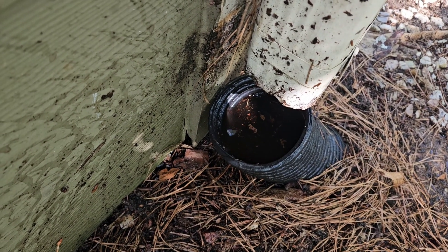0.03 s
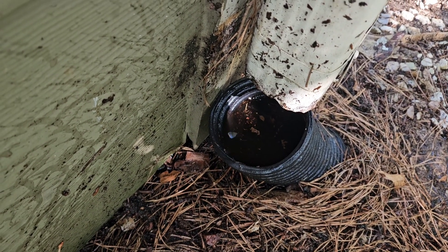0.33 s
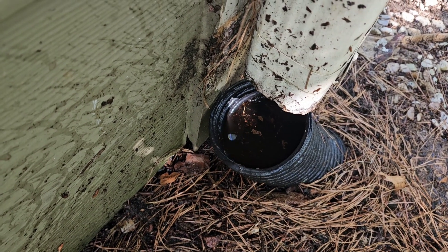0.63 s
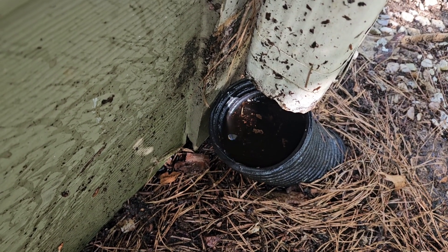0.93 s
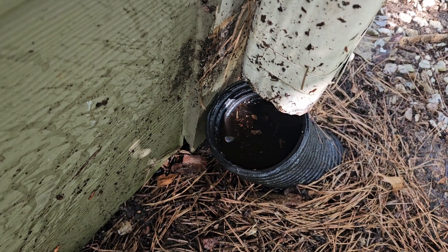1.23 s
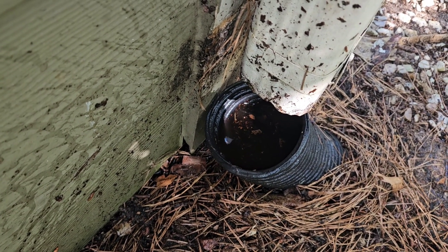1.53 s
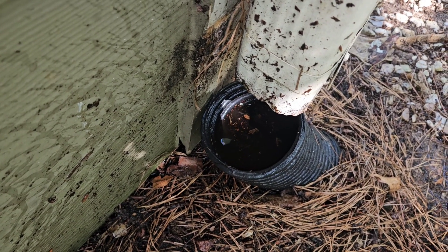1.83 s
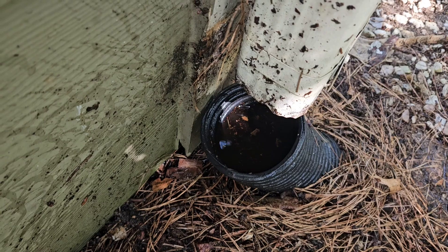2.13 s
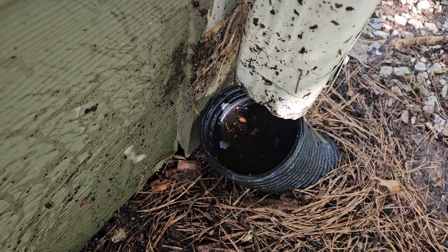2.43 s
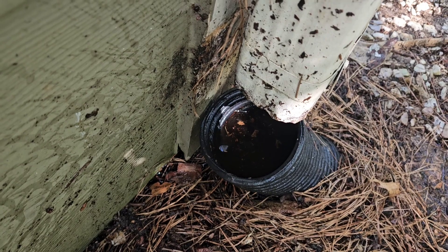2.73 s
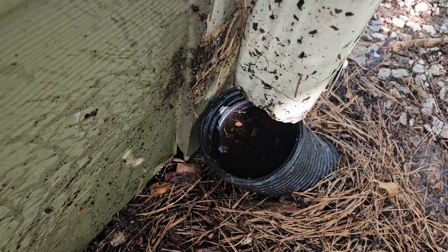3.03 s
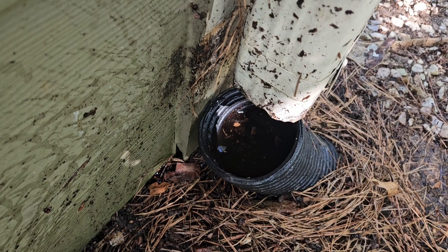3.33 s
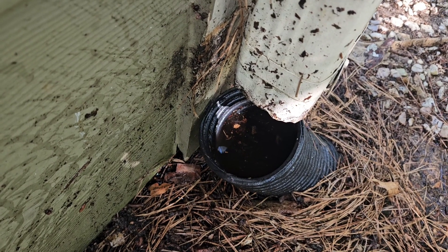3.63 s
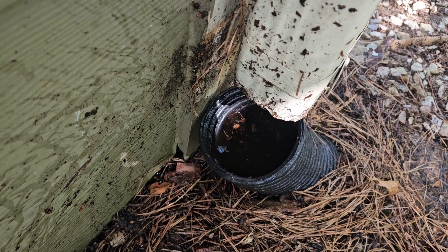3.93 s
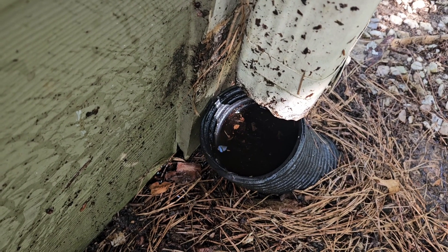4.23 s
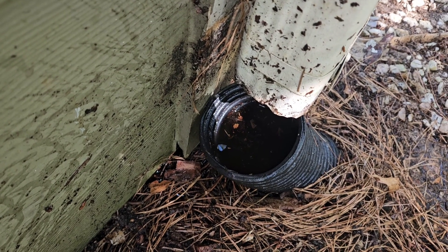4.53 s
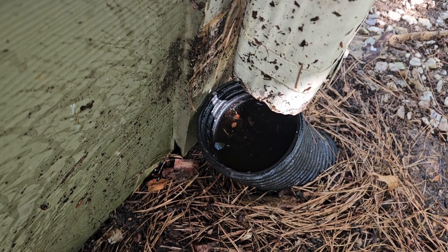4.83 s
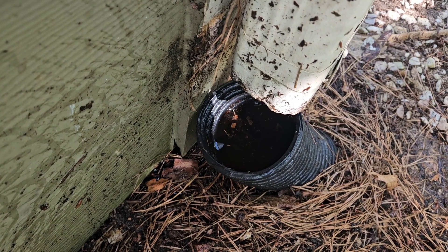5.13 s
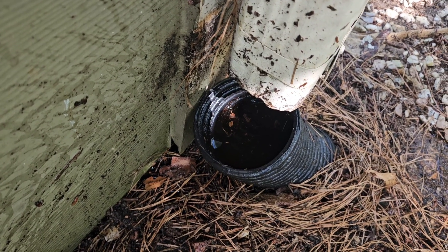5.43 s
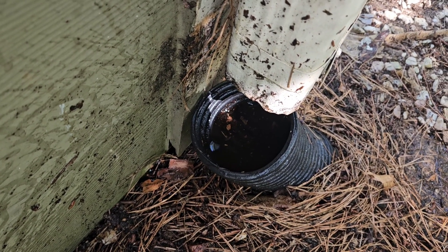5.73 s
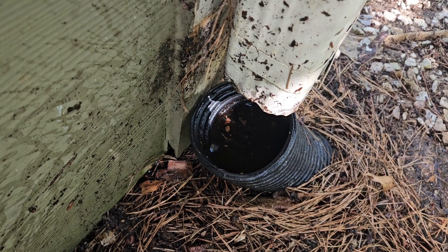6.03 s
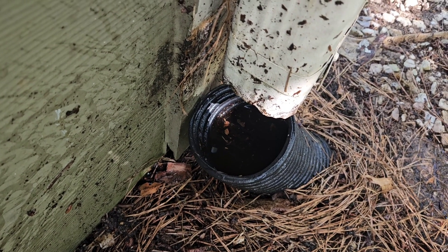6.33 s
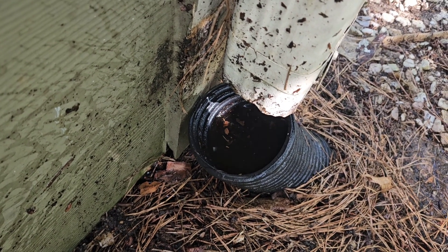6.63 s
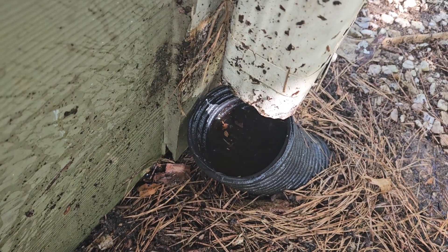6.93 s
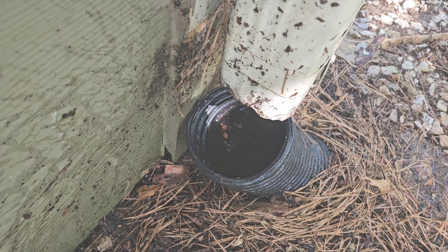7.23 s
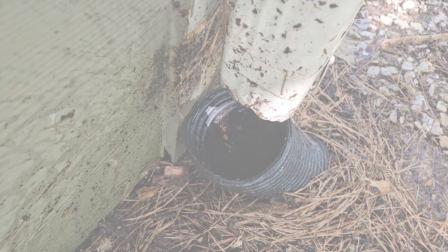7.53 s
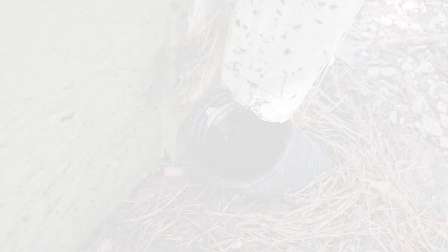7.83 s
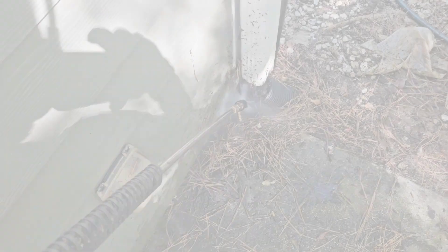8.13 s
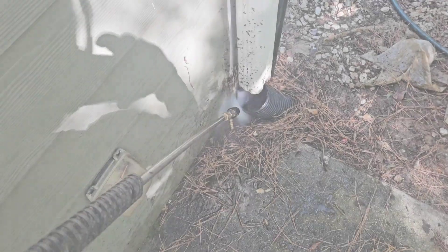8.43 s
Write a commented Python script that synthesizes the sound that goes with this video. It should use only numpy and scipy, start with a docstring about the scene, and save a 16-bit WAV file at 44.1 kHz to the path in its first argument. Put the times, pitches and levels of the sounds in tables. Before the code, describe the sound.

A pressure washer engine thumps steadily outdoors with a low drone and metallic clatter, then fades out near the end.

```python
"""A pressure washer's one-cylinder engine thumps steadily beside a house wall.
Each firing sends a puff through the muffler, the metal casing rings and clatters, and the valve gear
rasps twice per cycle (one cycle is one firing, or two turns of the shaft). The sound fades out,
then starts to fade in from another spot, where the water jet hisses against a drain pipe."""
import sys
import numpy as np
from scipy import signal
from scipy.fft import rfft, irfft, next_fast_len
from scipy.io import wavfile

SR = 44100
rng = np.random.default_rng(int(sys.argv[2]) if len(sys.argv) > 2 else 0)


def dump(signal):
    """Clip the signal to [-1, 1] and save it as 16-bit WAV at the path in sys.argv[1]."""
    limited = np.clip(np.atleast_2d(signal).T, -1, 1)
    pcm = np.round(limited * 32767).astype(np.int16)
    wavfile.write(sys.argv[1], SR, pcm)


N = 374850
TIME = np.arange(N) / SR
FFT_SIZE = 2 * next_fast_len(N // 2 + 8192)
FREQ = np.maximum(np.arange(FFT_SIZE // 2 + 1) * SR / FFT_SIZE, 1)

# How the muffler and wall shape the thump at each spot: firing_rate_multiple, relative_db
THUMP_FIRST_SPOT = [(1, -35.3), (2, -12.9), (3, -10.1), (4, -4.1), (5, 0.0), (6, -12.1), (7, -5.1),
                    (8, -2.1), (9, -11.5), (10, -13.5), (11, -23.9), (12, -27.9), (13, -27.7), (14, -31.4)]
THUMP_SPRAY_SPOT = [(1, -26.8), (2, -11.8), (3, -19.6), (4, 0.0), (5, -2.6), (6, -7.7), (7, -8.2),
                    (8, -13.7), (9, -18.3), (10, -28.0), (11, -26.1), (12, -32.6), (13, -33.0), (14, -26.7)]
# Tones of the casing at each spot: firing_rate_multiple (rounded when played), left_db, right_db
TONES_FIRST_SPOT = [(11, -46, -52), (18, -46, -76), (22, -43.5, -48), (24, -45, -46), (30, -47.5, -44.5),
                    (31, -41.5, -35), (32, -48, -40), (37, -46, -40.5), (38, -48, -43), (39, -57, -42),
                    (55, -53, -51), (56, -44, -37.5), (70.84, -63, -39.5), (87, -71, -44.5)]
TONES_SPRAY_SPOT = [(14, -38, -42), (24, -30, -47), (25, -42, -29), (37, -48, -32), (54, -45, -31)]
# The noise of the moving parts: pitch_hz, left_db, right_db
CLATTER_SHAPE = [(24.7, -75.5, -64.5), (160, -50.5, -54), (347, -60, -65.5), (470, -64, -69),
                 (754, -60.5, -65.5), (815, -69, -59.5), (1300, -76.5, -64.5), (1525, -67, -57.5),
                 (2020, -61.5, -66), (2350, -67.5, -66.5), (3640, -72.5, -67), (4500, -72.5, -67.5),
                 (8200, -71.5, -66.5), (15200, -74, -77.5)]
# Pitches the casing boosts by ringing, or weakens if negative: pitch_hz, width_hz, boost_db
CASING_RINGS = [(844, 47, 6), (1050, 127, 5), (1401, 75, 6), (1580, 100, 3.5), (1950, 53, 4), (2130, 18, 3),
                (2500, 22, 4), (2580, 36, 4.5), (4340, 260, 7), (5880, 89, -4.5), (7400, 110, 3.5),
                (8710, 1020, 5.5), (12200, 320, -0.5)]
# The valve gear's two rasps: start_cycles, rise_cycles, pitch_hz, width_hz, level_db
VALVE_RASPS = [(.297, 0.12, 7950, 7800, -68.5), (.647, 0.091, 13700, 7000, -65.5)]
# Water hiss and engine noise at the spraying spot: pitch_hz, left_db, right_db
SPRAY_SHAPE = [(25, -70, -63), (150, -56, -46), (516, -76, -61.5), (680, -55, -58), (1290, -55.5, -50),
               (1800, -61, -59.5), (2500, -59.5, -57), (3300, -62, -61), (4940, -69, -65),
               (5630, -56.5, -59), (8050, -59.5, -53.5), (10300, -62, -62), (12200, -61, -60),
               (15500, -65, -70)]

FIRING_HZ, SPRAY_FIRING_HZ = 27.956, 27.5
SILENT_AT_S, FADE_S = 7.942, 1.69
JET_HITS_S, JET_RISE_S, JET_MISS_DB = 8.12, .05, -2
LEFT_DELAY_SAMPLES, TOP_HZ = 19, 15850


def undb(db):
    """Turn decibels into a number to multiply by."""
    return 10 ** (np.asarray(db) / 20)


def curve(hz, db):
    """A tone shape (dB at every pitch) drawn through a few points."""
    return np.interp(np.log(FREQ), np.log(hz), db)


def bumps(rows):
    """A tone shape made of rounded peaks and dips."""
    return sum(db / (1 + (2 * (FREQ - hz) / width) ** 2) for hz, width, db in rows)


def colour(x, db):
    """Filter a sound by a tone shape so that it rings after a knock, never before."""
    cepstrum = irfft(db * np.log(10) / 20)
    cepstrum[..., 1:FFT_SIZE // 2] *= 2
    cepstrum[..., FFT_SIZE // 2 + 1:] = 0
    return irfft(rfft(x, FFT_SIZE) * np.exp(rfft(cepstrum)))[..., :N]


def noise():
    """An even hiss, 0 dB per Hz."""
    return rng.standard_normal(N) * np.sqrt(SR / 2)


def wander(rate_hz):
    """A value that drifts at random, typically about 1 away from zero."""
    steps = rng.standard_normal(2048)
    return np.interp(TIME * rate_hz, np.arange(len(steps)), steps) * np.sqrt(3 / 2)


def stereo(x):
    """Sound reaches the right microphone just before the left."""
    return np.array([np.pad(x, (LEFT_DELAY_SAMPLES, 0))[:N], x])


def scatter(direct, loudness, corner_hz):
    """Low sound mostly arrives straight; higher up, scattered noise, unlike on each side, takes over."""
    direct_share = .2 + .72 / (1 + (FREQ / corner_hz) ** 2)
    scattered = loudness * np.array([noise(), noise()])
    straight = colour(stereo(direct), 10 * np.log10(direct_share))
    return straight + colour(scattered, 10 * np.log10(1 - direct_share))


def ripple(db, spacing_hz):
    """Many small rings and echoes make the treble uneven, differently on each side."""
    heights = rng.standard_normal((2, 1024))
    depth_db = db * np.minimum(FREQ / 3500, 1)
    return depth_db * np.array([np.interp(FREQ / spacing_hz, np.arange(1024), row) for row in heights])


def engine_cycles():
    """Count cycles at the speed the governor holds: it creeps up a little and wavers slightly."""
    firing_hz = FIRING_HZ + .012 * TIME
    return .093 + np.cumsum(firing_hz) / SR + .014 * wander(3.5)


def exhaust(cycles, shape, db, uneven_db, jitter_s, side_gap_db):
    """Each firing sends one puff of pressure ringing through the muffler."""
    firings = np.arange(int(cycles[-1]) + 1)
    chance = rng.standard_normal((len(firings), 2))
    times_s = np.interp(firings, cycles, TIME) + jitter_s * chance[:, 0]
    puffs = np.zeros(N)
    puffs[np.clip(times_s * SR, 0, N - 1).astype(int)] = undb(uneven_db * chance[:, 1])
    hz = np.arange(1, len(shape) + 1) * (cycles[-1] - cycles[0]) / TIME[-1]
    high_cut_db = 24 * np.log2(np.maximum(FREQ / hz[-1], 1))
    low_cut_db = 12 * np.log2(np.maximum(hz[0] / FREQ, 1))
    thumps = colour(puffs, curve(hz, np.array(shape)[:, 1]) - high_cut_db - low_cut_db)
    # the right side is shielded more as the pitch rises
    gap_db = side_gap_db * np.minimum(FREQ / 280, 1) ** 2
    side_gains = undb(db + np.array([gap_db, -gap_db]) / 2)
    return irfft(rfft(stereo(thumps / thumps.std()), FFT_SIZE) * side_gains)[:, :N]


def muffler_delay(x, hz, width_hz):
    """Sound near one pitch lingers in the muffler and leaves late, just as loud."""
    phase = -2 * np.arctan2(FREQ * width_hz, hz ** 2 - FREQ ** 2)
    return irfft(rfft(x, FFT_SIZE) * np.exp(1j * phase))[..., :N]


def casing_tones(cycles, tones, db, waver_db, wobble_rad):
    """The shaft shakes the casing at pitches where it rings, making wavering tones."""
    out = 0
    for multiple, left_db, right_db in tones:
        phase = 2 * np.pi * round(multiple) * cycles + rng.uniform(0, 2 * np.pi)
        tone = np.sqrt(2) * np.sin(phase + wobble_rad * wander(20))
        tone *= undb(waver_db * wander(16))
        out = out + undb(db + np.array([[left_db], [right_db]])) * stereo(tone)
    return out


def clatter(cycles, repeat_share, slack_s, throb_db):
    """The same small knocks come round every cycle, a bit early or late as the parts are loose."""
    one_cycle = noise()[:int(TIME[-1] * SR / (cycles[-1] - cycles[0]))]
    place = (cycles % 1 * len(one_cycle) + slack_s * SR * wander(40)).astype(int)
    # the low rumble under the knocks hardly repeats
    share = repeat_share * (.01 + 1 / (1 + (370 / FREQ) ** 8))
    repeating = colour(one_cycle[place % len(one_cycle)], 10 * np.log10(share))
    fresh = colour(noise(), 10 * np.log10(1 - share))
    loudness = undb(throb_db * np.cos(2 * np.pi * (cycles - .5)) + .54 * wander(30))
    hz, left_db, right_db = np.transpose(CLATTER_SHAPE)
    shape_db = np.array([curve(hz, left_db), curve(hz, right_db)])
    casing_db = bumps(CASING_RINGS) + ripple(db=2.03, spacing_hz=70.05)
    knocks = scatter(loudness * (repeating + fresh), loudness, corner_hz=2360)
    return colour(knocks, shape_db + casing_db)


def valve_gear(cycles, uneven_db, grit_db, drift_db):
    """The parts that work the valves rasp twice a cycle, ringing through the casing."""
    out = 0
    casing_db = bumps(CASING_RINGS) + ripple(db=4.0, spacing_hz=88.64)
    # the treble leans to the right, most near 6600 Hz
    lean_db = bumps([(6600, 15000, 2.1)]) * np.array([[-.5], [.5]])
    for start, rise, hz, width, db in VALVE_RASPS:
        cycle, age = np.divmod(cycles - start + 1, 1)
        chance = rng.standard_normal(int(cycles[-1]) + 2)[cycle.astype(int)]
        strength = undb(uneven_db * chance + drift_db * wander(2.23))
        grit = undb(grit_db * np.repeat(rng.standard_normal(N // 30 + 1), 30)[:N])
        swell = (age / rise * np.exp(1 - age / rise)) ** 2.17  # quick rise, slower fall
        loudness = swell * strength * grit
        band_db = -10 * np.log10(1 + ((FREQ - hz ** 2 / FREQ) / width) ** 2)
        rasp = scatter(loudness * noise(), loudness, corner_hz=4920)
        out = out + colour(rasp, db + band_db + lean_db + casing_db)
    return out


def water_jet(cycles, db, pump_db, flutter_db):
    """The jet hisses, pulsing with the pump, and gets louder when it meets the pipe."""
    off_pipe = np.clip(.5 - (TIME - JET_HITS_S) / JET_RISE_S, 0, 1)
    pulse_db = pump_db * np.cos(2 * np.pi * 6 * cycles)  # three plungers, two shaft turns a cycle
    loudness = undb(JET_MISS_DB * off_pipe + pulse_db + flutter_db * wander(60))
    hiss = scatter(loudness * noise(), loudness, corner_hz=1300)
    hz, left_db, right_db = np.transpose(SPRAY_SHAPE)
    return colour(hiss, db + np.array([curve(hz, left_db), curve(hz, right_db)]))


def scene():
    """The running engine fades to silence, then the spraying starts to fade in."""
    cycles = engine_cycles()
    thumps = exhaust(cycles, THUMP_FIRST_SPOT, db=-15, uneven_db=-.06, jitter_s=.00004, side_gap_db=3.5)
    thumps = muffler_delay(thumps, hz=85.6, width_hz=20)
    running = muffler_delay(thumps, hz=326, width_hz=144)
    running += casing_tones(cycles, TONES_FIRST_SPOT, db=-.5, waver_db=1.6, wobble_rad=.18)
    running += clatter(cycles, repeat_share=.43, slack_s=.00004, throb_db=.5)
    running += valve_gear(cycles, uneven_db=1.8, grit_db=2.8, drift_db=.16)

    cycles = .256 + SPRAY_FIRING_HZ * TIME  # a little slower under load
    thumps = exhaust(cycles, THUMP_SPRAY_SPOT, db=-17, uneven_db=0, jitter_s=.00004, side_gap_db=5)
    spraying = muffler_delay(thumps, hz=172, width_hz=160)
    spraying += casing_tones(cycles, TONES_SPRAY_SPOT, db=-5, waver_db=4.5, wobble_rad=.5)
    spraying += water_jet(cycles, db=-.2, pump_db=.5, flutter_db=1)

    fade = np.minimum(np.abs(TIME - SILENT_AT_S) / FADE_S, 1)
    return fade * np.where(TIME < SILENT_AT_S, running, spraying)


def record(dry):
    """The microphone openings put a dip in the treble, and the very highest sound is cut."""
    heard = colour(dry, bumps([(9720, 1220, -9.0)]))
    return signal.sosfilt(signal.ellip(12, .1, 80, TOP_HZ, fs=SR, output="sos"), heard)


dry = scene()
out = record(dry)
dump(out)
```